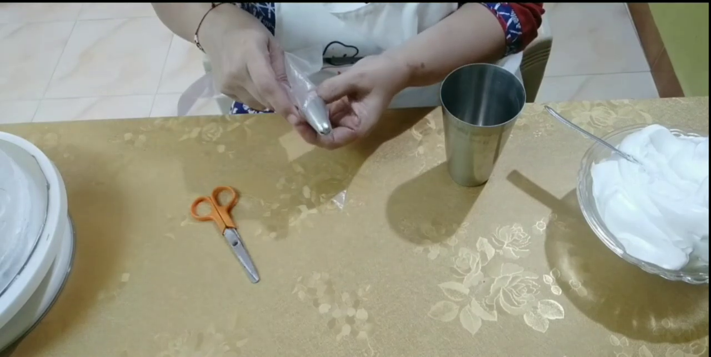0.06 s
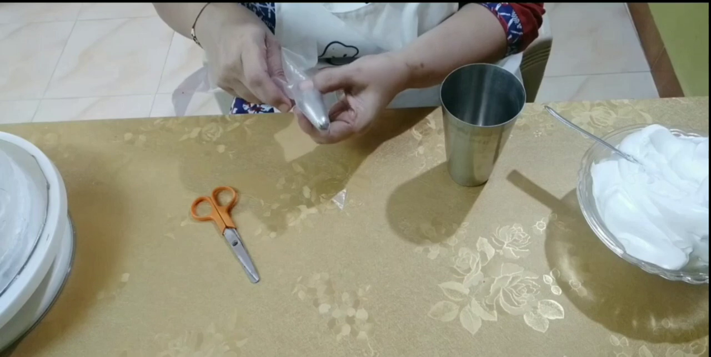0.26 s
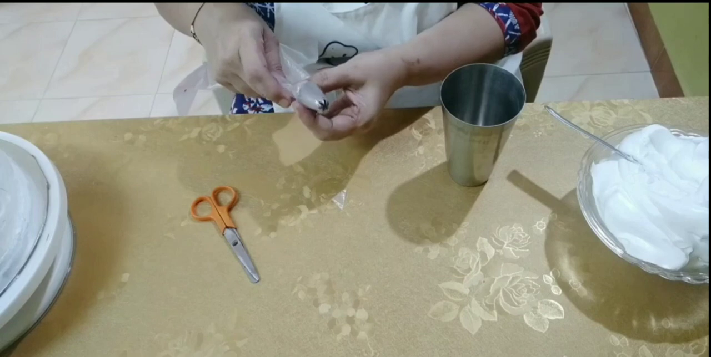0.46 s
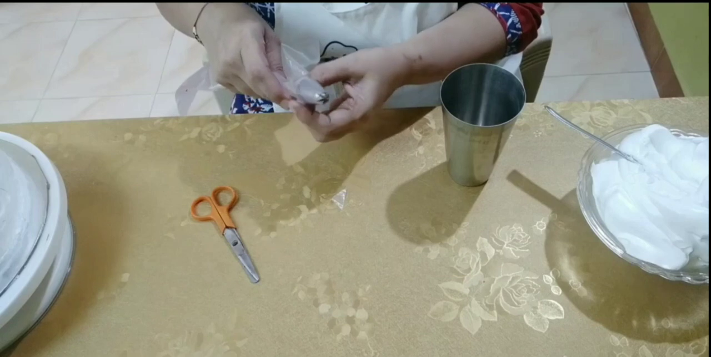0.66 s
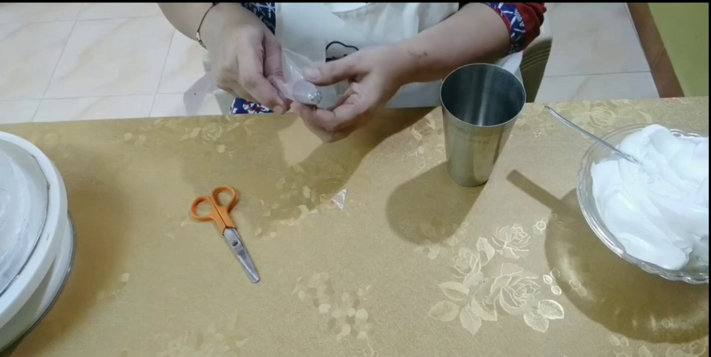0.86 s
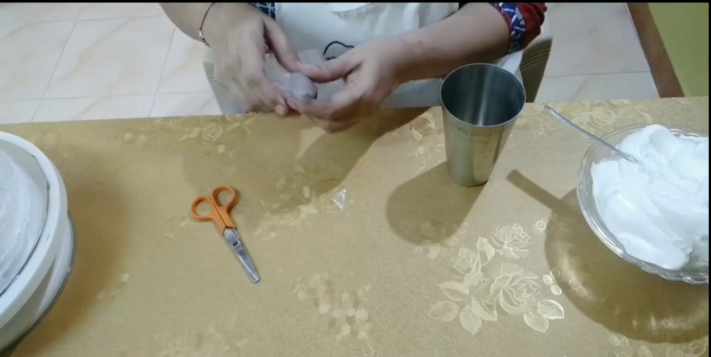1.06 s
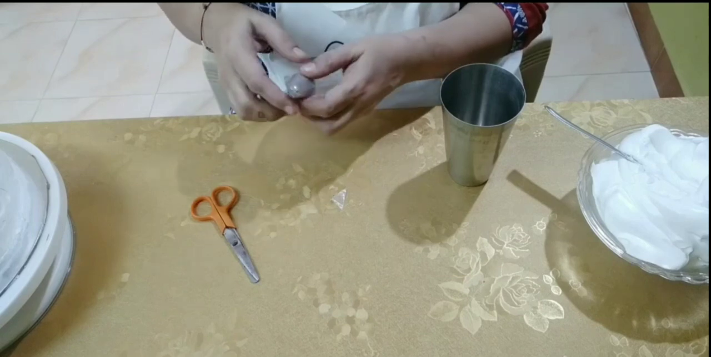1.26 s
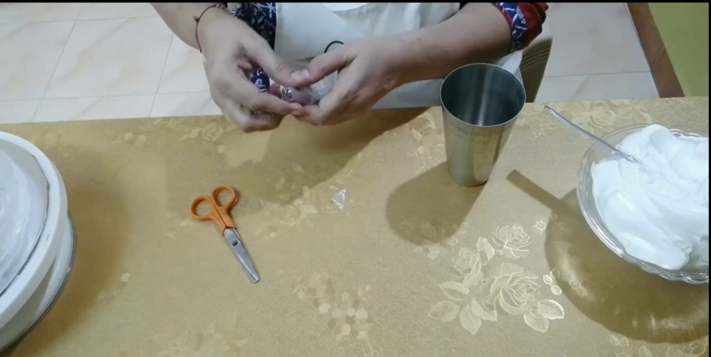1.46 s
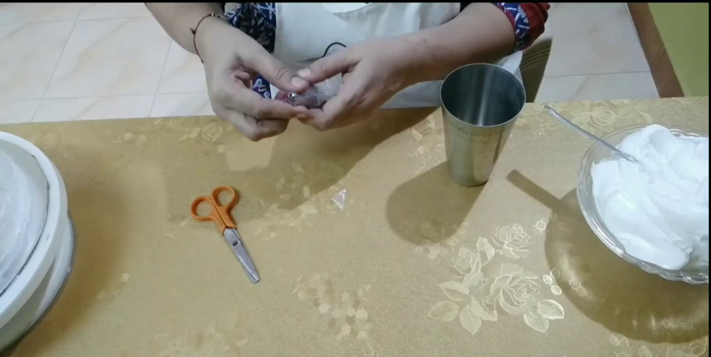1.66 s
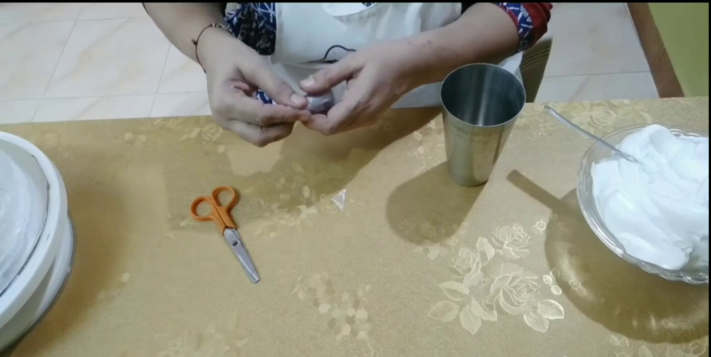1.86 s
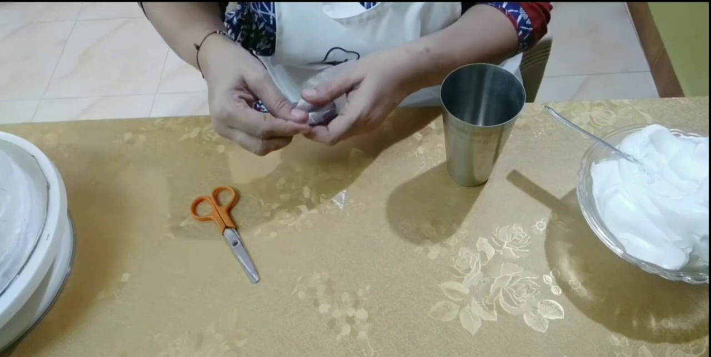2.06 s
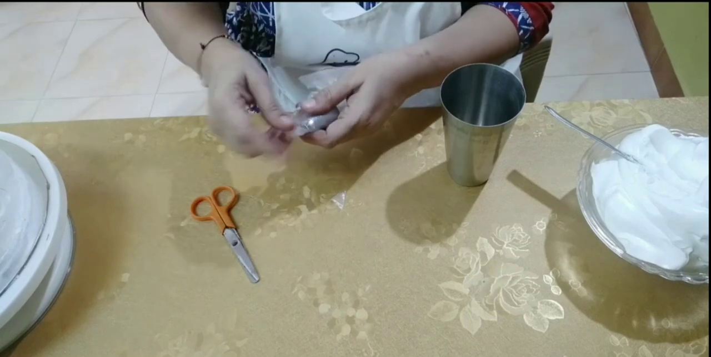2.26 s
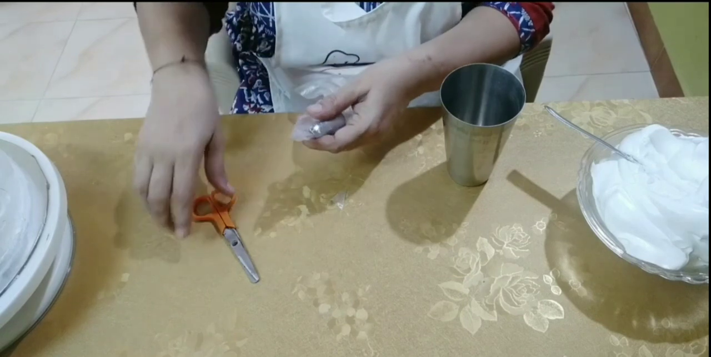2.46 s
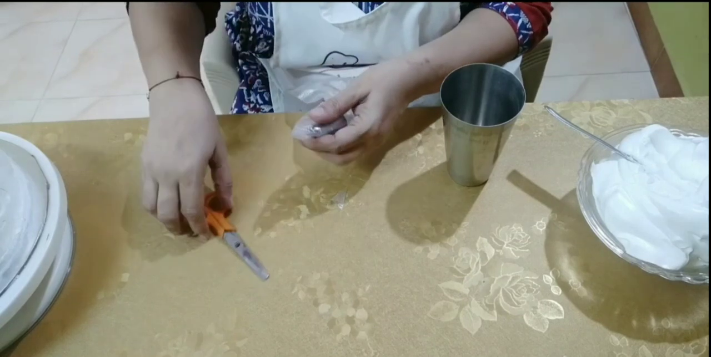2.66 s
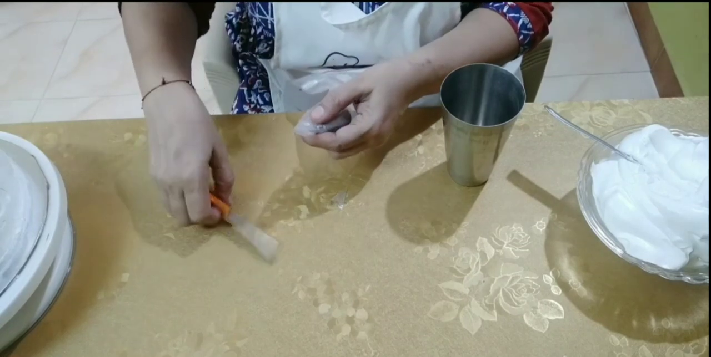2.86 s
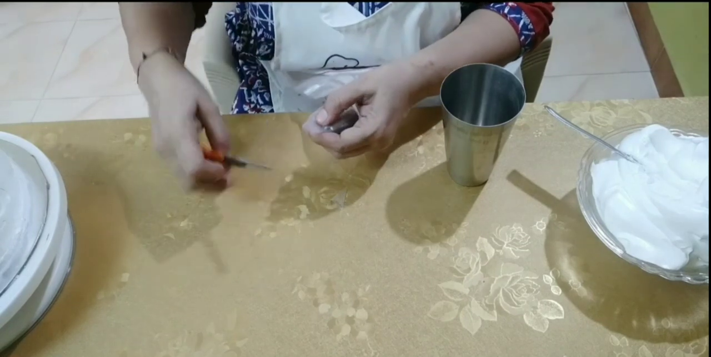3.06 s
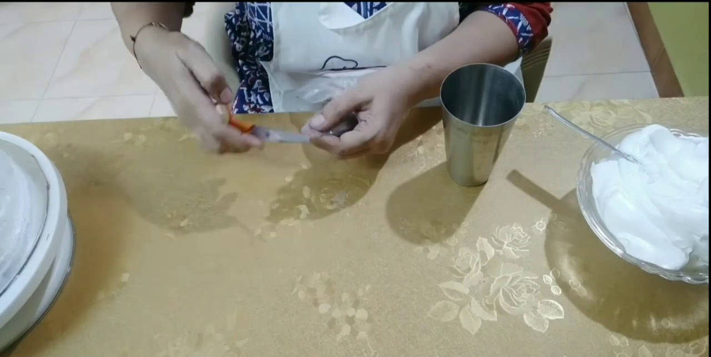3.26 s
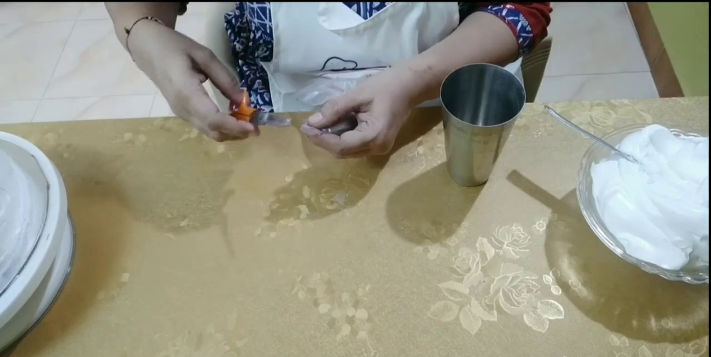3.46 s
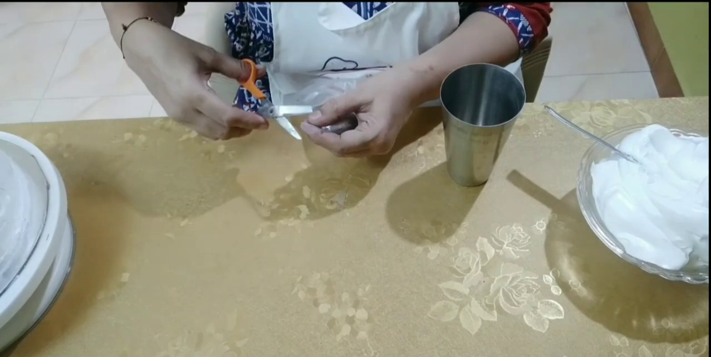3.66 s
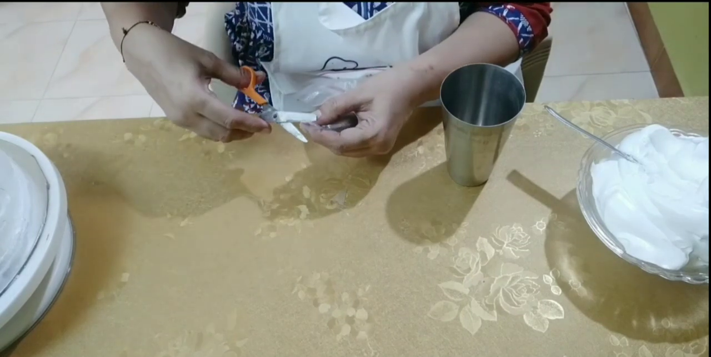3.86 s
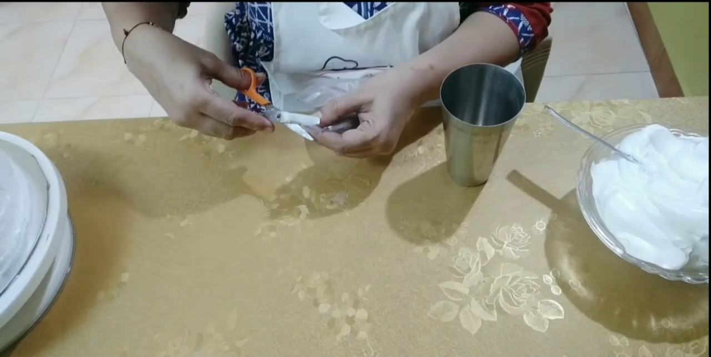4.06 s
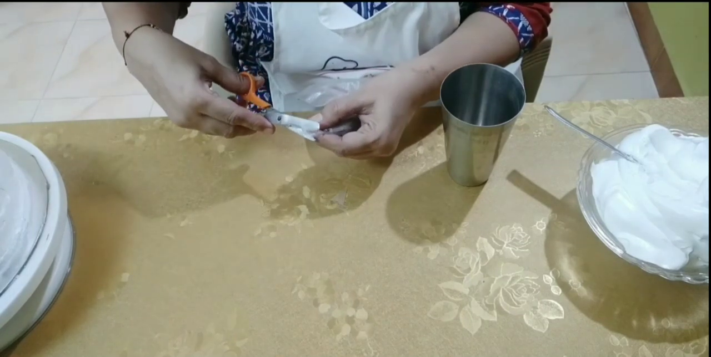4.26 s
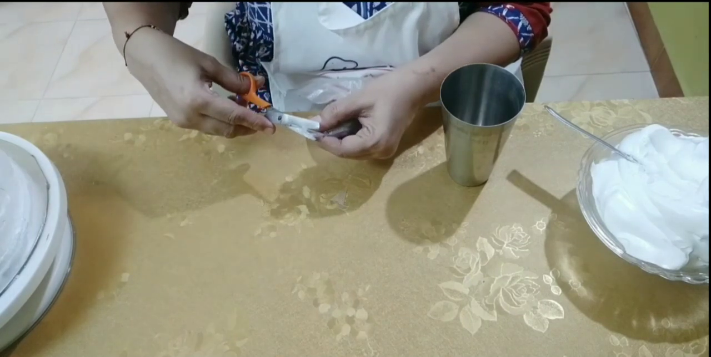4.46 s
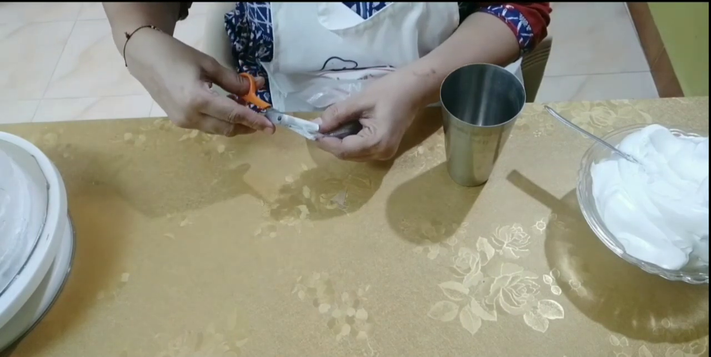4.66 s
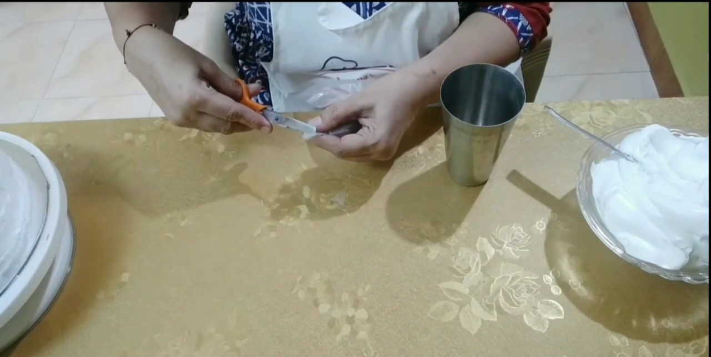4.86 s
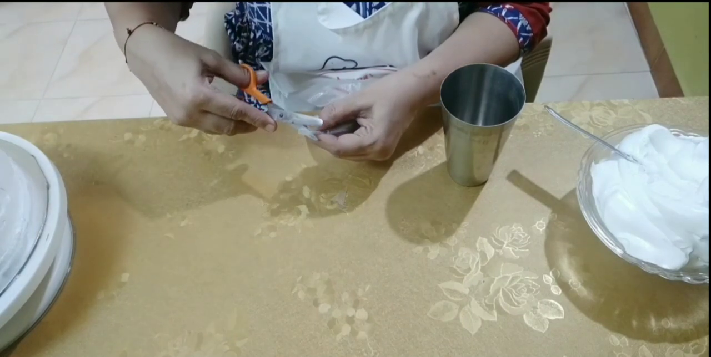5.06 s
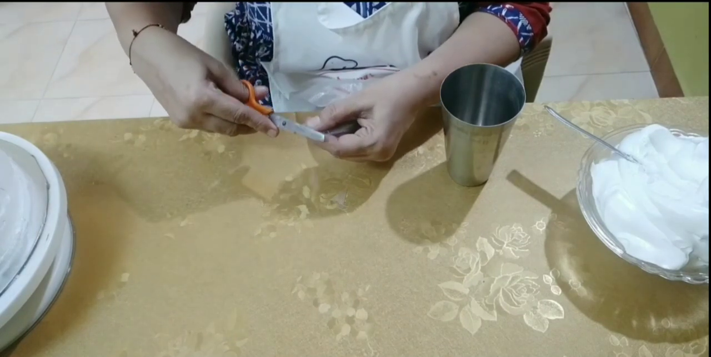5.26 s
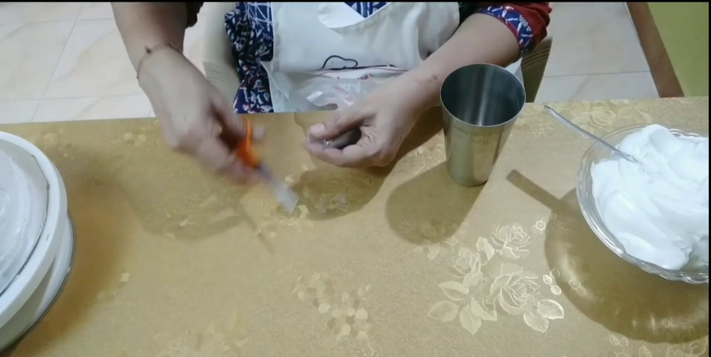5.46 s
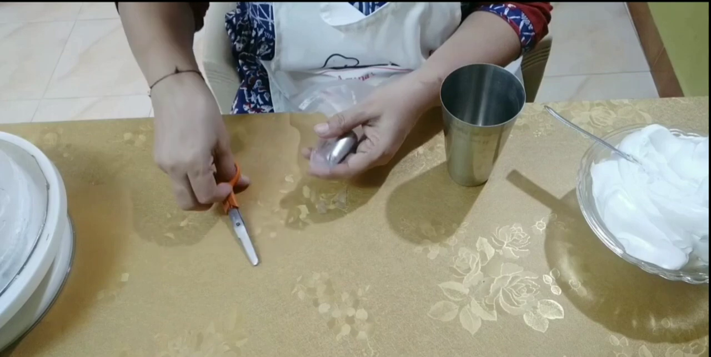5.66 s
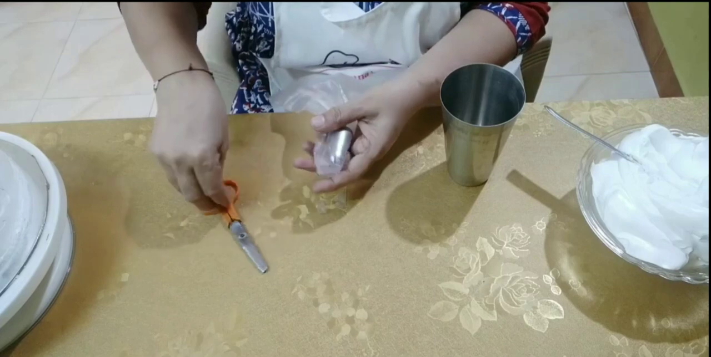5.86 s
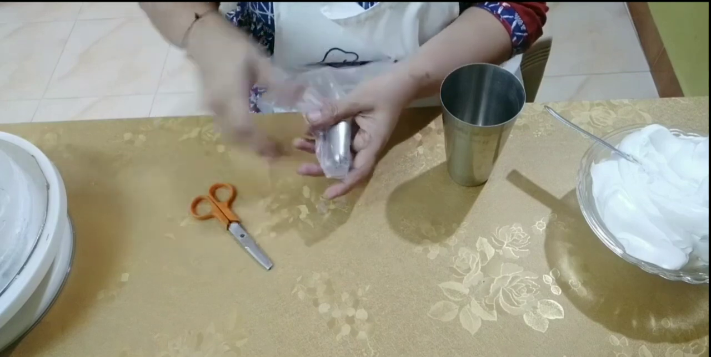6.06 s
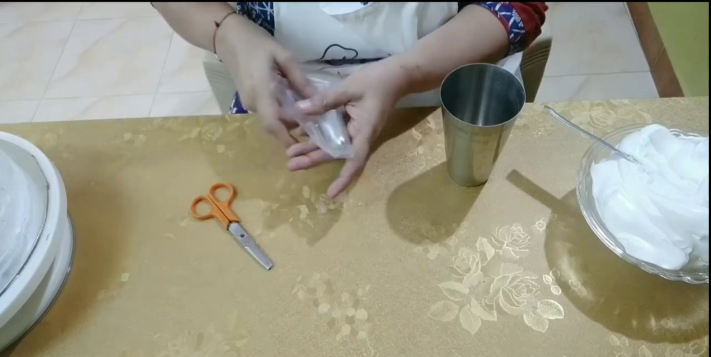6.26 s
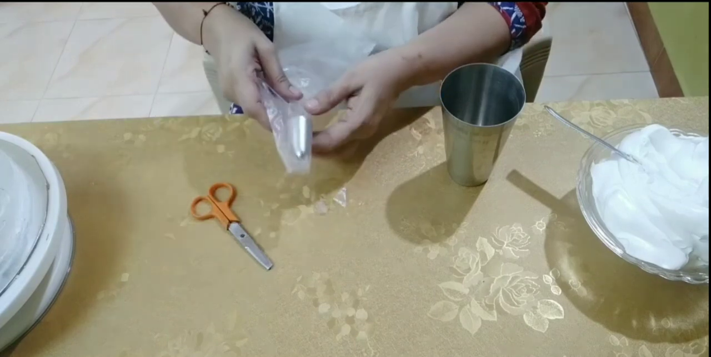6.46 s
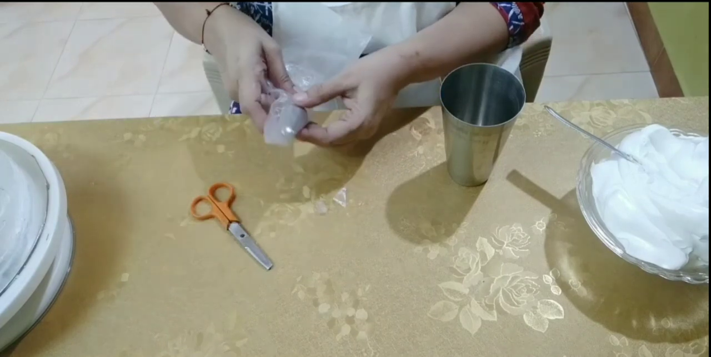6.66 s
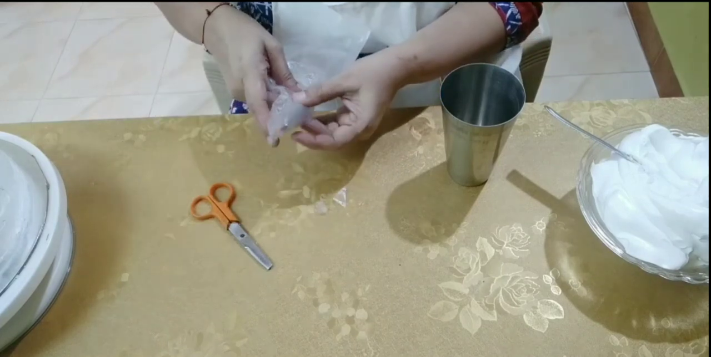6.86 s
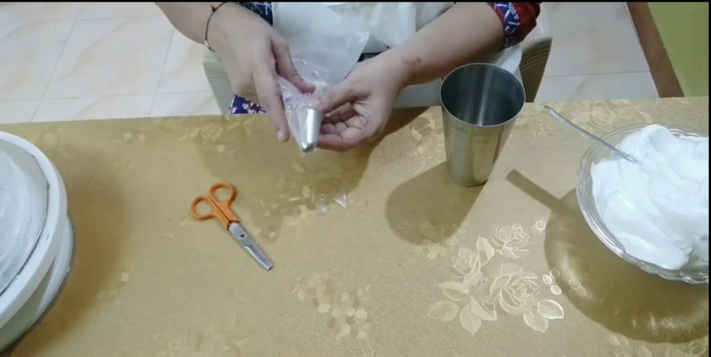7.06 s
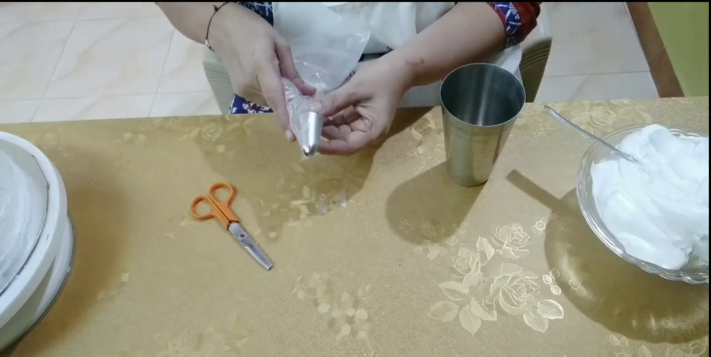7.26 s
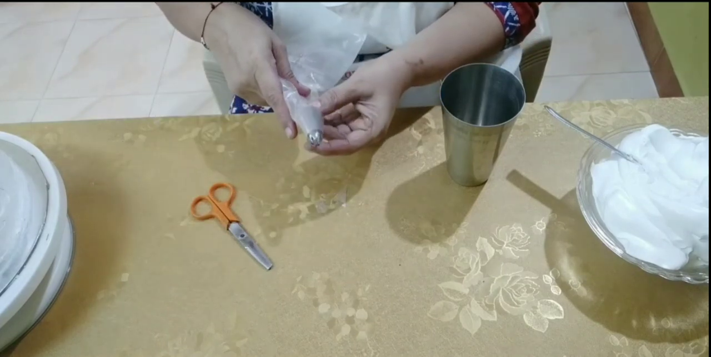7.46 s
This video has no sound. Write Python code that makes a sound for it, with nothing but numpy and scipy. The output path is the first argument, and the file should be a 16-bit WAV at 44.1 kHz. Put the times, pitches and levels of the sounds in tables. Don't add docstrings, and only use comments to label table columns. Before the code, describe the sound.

Thin plastic film crinkles and snaps close by as a metal nozzle is pushed in, scissors snip faintly, then clatter onto a table.

```python
import sys
import numpy as np
from scipy import signal
from scipy.fft import rfft, irfft
from scipy.io import wavfile
from scipy.ndimage import uniform_filter1d

SR = 44100
rng = np.random.default_rng(int(sys.argv[2]) if len(sys.argv) > 2 else 0)


def how_loud(loudness_db):
    steps = np.asarray(loudness_db, float) / 20
    return 10 ** steps


def wrap_up_sound(samples):
    columns = np.atleast_2d(samples).T
    tamed = np.clip(columns, -1, 1)
    steps = np.round(tamed * 32767).astype(np.int16)
    wavfile.write(sys.argv[1], SR, steps)


N = 331632

# (frequency [Hz], density [dB per Hz])
FILM_SUM = [(150, -42), (250, -26), (476, -11.5), (650, -9), (1240, -3.5), (1980, -3), (2500, -10.5),
            (3050, -10.5), (3250, -25.5), (3750, -23), (4120, -3.5), (6820, -3), (8400, -9.5),
            (15500, -18.5)]
FILM_DIFF = [(150, -52), (250, -16.5), (600, -21), (1010, -16), (1500, -10), (2130, -3.5), (2700, -5),
             (3700, -9), (4150, -6), (6700, -4.5), (8400, -9), (15500, -15.5)]
# (time [s], crackle [dB])
RESTLESS = [(0, -60.5), (.54, -55.5), (.65, -70.5), (.94, -70.5), (1.4, -61), (1.8, -71), (2.1, -60),
            (2.45, -60), (2.6, -73.5), (2.9, -63), (3.3, -77.5), (4.1, -88.5), (5.3, -84), (6.15, -68.5),
            (6.5, -57.5), (7.0, -43), (7.2, -57), (7.52, -61.5)]
# (time [s], crackle [dB], hold [s], body re crackle [dB])
KNEADS = [
    (.775, -51, 0.066, -2.5),
    (2.29, -52, 0.022, 1),
    (2.88, -59.5, 0.002, 2.5),
    (5.58, -71.5, 0.016, 5.5),
    (7.1, -46.5, 0.0089, 2.5),
]
# (time [s], crackle [dB], hold [s], body re crackle [dB])
SQUEEZES = [(0, -53.5, 0.038, -8), (.97, -62.5, 0.077, -1), (1.055, -36.5, 0.045, -10.5),
            (1.3, -77, 0.0033, -12), (1.38, -58, 0.0046, -53), (1.455, -41, 0.011, -14),
            (2.135, -59.5, 0.026, 4), (2.175, -50, 0.098, 0), (2.47, -58, 0.0044, -18),
            (6.22, -50, 0.016, -5), (6.27, -25.5, 0.072, -3), (6.37, -36, 0.028, -6.5),
            (6.74, -40.5, 0.004, -7), (7.12, -53, 0.0017, 7.5), (7.31, -57, 0.0036, 2),
            (7.37, -38.5, 0.0019, -2)]
# (time [s], crackle [dB], hold [s], body re crackle [dB])
SHOVE = [
    (1.84, -45, 0.015, -2.5),
    (1.875, -23.5, 0.024, -4.5),
    (1.905, -29.5, 0.045, -2.5),
]
# (time [s], crackle [dB], hold [s], body re crackle [dB], air re crackle [dB])
STROKES = [(2.62, -58.5, 0.034, 5.5, -14.5), (2.66, -59, 0.0056, 5, -13.5), (2.97, -61, 0.004, -2, -9),
           (3.055, -39, 0.0053, -6.5, -7), (3.33, -57.5, 0.02, -2.5, -9.5), (3.47, -67.5, 0.0048, 2, -15.5),
           (3.595, -48, 0.0056, -3.5, -9.5), (3.64, -55, 0.002, -28, -14), (3.94, -60, 0.0036, 0, -11.5),
           (4.08, -79.5, 0.0046, -7.5, -30), (4.15, -79, .01, -13.5, -10), (4.19, -59.5, 0.0039, -10, -3.5),
           (4.33, -61.5, 0.033, -5, -5), (4.39, -54.5, 0.053, -6, -9), (4.45, -47, 0.0032, -7.5, -11),
           (4.73, -77, 0.033, -1, -7.5), (4.842, -56.5, 0.025, -13, -4), (4.8, -71.5, 0.015, -2, -8),
           (4.88, -50, 0.0017, -7, -9.5), (5.03, -62.5, 0.0067, -2.5, -6.5), (5.305, -56, 0.028, 8, -4.5),
           (5.72, -73, 0.11, 12, -9), (5.9, -37.5, 0.016, -8.5, -11.5), (5.945, -32, 0.018, 6, -9),
           (5.99, -40.5, 0.016, 12.5, -10.5)]
# (time [s], peak [dB], body re peak [dB])
NOZZLE_CREASES = [(.0947, -38, -2), (.1095, -43, -2), (.1885, -55, 6), (.2319, -37, -9), (.266, -34, -4),
                  (.2997, -36.5, 4), (.312, -36.5, -14), (.3496, -40, -3), (.4105, -33.5, -7),
                  (.452, -31, -21), (.468, -44, -20), (.5182, -42, -19), (.5796, -36.5, -17),
                  (.7043, -41, -16.5), (.7437, -38, 3.5), (.819, -41, -18), (1.058, -24, -24),
                  (1.071, -48, -15), (1.095, -48, -5), (1.195, -35, -8), (1.8663, -31, -9),
                  (1.885, -15, -23), (1.913, -20.5, -18), (1.9341, -20, -16), (2.2033, -39, 5),
                  (2.21, -48, -14), (2.3844, -62, -6), (2.4038, -42, 4.5), (2.4497, -38, -4),
                  (.1173, -44, 7), (.1433, -30.5, -0.5), (.2463, -28, -7.5), (.402, -33, -10),
                  (.44, -32, -2.5), (.5402, -33, -21), (.6536, -39.5, -0.5), (.964, -37.5, -14),
                  (1.043, -26.5, -3), (1.2787, -36.5, -26), (1.295, -49, -21), (1.3685, -27.5, -8.5),
                  (1.4364, -32.5, -2), (1.4483, -20, -33), (1.4625, -26.5, -1.5), (1.472, -23, -7),
                  (1.5365, -28.5, -9.5), (1.6728, -38.5, -9), (1.8103, -56, -19), (1.8262, -38, -13),
                  (1.84, -26.5, 1.5), (1.8527, -21, -30), (1.8752, -13, 3), (1.997, -26.5, -16.5),
                  (2.134, -25, -18), (2.158, -24, -26), (2.163, -24, -29), (2.168, -16.5, -22)]
# (time [s], peak [dB], body re peak [dB])
HANDLE_TICKS = [(2.6175, -32, 1.5), (2.7887, -37.5, -10), (2.85, -37, -20), (2.8858, -40, -26),
                (2.9708, -35.5, -25), (3.025, -37, 4), (3.044, -23, -8), (3.0475, -18.5, -20),
                (3.057, -37, -17), (3.071, -33, -30), (3.078, -50, -19), (3.214, -40.5, -18),
                (3.3189, -53, -13), (3.452, -50.5, 0.5), (3.478, -36, -38), (5.454, -45, 0.5),
                (5.553, -47, -18), (5.813, -51, -26), (5.7003, -33, 5.5), (5.7204, -32, 2.5),
                (5.8805, -29, -9), (5.901, -16.5, -22), (5.913, -24, -5), (5.925, -32, -3),
                (5.999, -18.5, -12), (5.938, -15, 11.5)]
# (time [s], peak [dB], body re peak [dB])
BLADE_TICKS = [(3.5663, -41.5, -4), (3.5844, -34.5, 2), (3.6024, -34, -9), (3.6338, -28, -40),
               (3.9105, -51, 3), (3.926, -33, -12.5), (4.0676, -45.5, -6), (4.126, -42, -8.5),
               (4.148, -37.5, -32.5), (4.1699, -35, -26), (4.1853, -34.5, -40), (4.3238, -32, -23),
               (4.369, -28, -17.5), (4.411, -28, -35), (4.45, -26, -12.5), (4.6795, -50, -11.5),
               (4.7224, -38, -22), (4.8219, -51, -31), (4.8399, -35.5, -30), (4.857, -30, -32),
               (4.868, -36, -10), (4.8758, -21, -10.5), (5.024, -38, -24), (5.274, -53.5, -21.5),
               (5.281, -56, -21), (5.298, -31.5, 4)]
# (time [s], peak [dB], body re peak [dB])
OPENING_CREASES = [(6.221, -23, -12), (6.2343, -16, -9), (6.2667, -16, -5), (6.2846, -8, -3),
                   (6.291, -12, -1), (6.31, -10, -24), (6.3225, -14.5, -15), (6.328, -23, -13),
                   (6.386, -18.5, -17), (6.4528, -38, 1), (6.5441, -51, -11), (6.5721, -38.5, 4.5),
                   (6.6045, -57, -1), (6.6359, -52, -21), (7.0609, -34, -17), (7.25, -29.5, -8),
                   (7.4785, -44, -27), (6.2061, -19.5, -23), (6.2492, -12.5, -19), (6.6586, -31.5, -23),
                   (6.6885, -26.5, -3), (6.7405, -22.5, -3.5), (6.877, -25, -6), (6.1925, -52, -15),
                   (7.086, -22, -10), (7.091, -21.5, -9), (6.947, -28, -4), (7.0, -30.5, 3),
                   (7.1112, -21.5, -21), (7.2243, -35, 4.5), (7.2963, -32.5, -10), (7.339, -29.5, -7),
                   (7.3517, -27, -10), (7.3706, -21, -20)]
# (time [s], peak [dB], rattle length [s], first blow [0-2], rattle build-up [s])
KNOCKS = [
    (2.623, -23.5, 0.046, 0.02, 0.017),
    (5.700, -33, 0.035, 0.32, 0.0047),
    (5.9354, -15.5, 0.056, 1, 0.0022),
]
# (time [s], blow [0-2])
BOUNCES = [
    (2.632, 0.49),
    (2.644, 0.41),
    (2.653, 0.46),
    (2.667, 0.2),
    (5.938, 1),
    (5.945, 0.13),
    (5.959, 0.99),
    (5.97, 0.48),
    (5.977, 0.45),
    (5.999, 0.21),
]
# (frequency [Hz], level [dB], t60 [s])
LIFT_MODES = [(267, -8.5, 0.34), (526, -15, 0.33), (670, -16, 0.082), (778, -1.5, 0.2), (860, -11, 0.093),
              (930, 3, 0.24), (1010, -18, 0.19), (1565, -18, .15), (1710, -22, .06)]
TOUCH_MODES = [(308, 2.5, 0.81), (568, 7.5, 0.31), (721, 13.5, 0.18), (1085, 6, 0.12), (1200, -2, 0.15),
               (1287, -38, 0.17), (1630, 10, 0.14), (1930, -7, 0.13)]
DROP_MODES = [(295, -0.5, 0.6), (531.5, 0, 1), (574, 2, 0.69), (644, 4, 0.36), (724, 3.5, 0.19),
              (782, -4.5, 0.64), (918, 2, 0.48), (1220, -2.5, 0.27), (1423, 2, 0.1), (1866, 5.5, 0.3),
              (2100, 0.5, 0.096), (2180, -10, 0.16), (2240, -23, .1), (2650, -45, 0.026)]
# (time [s], peak [dB], pitch [Hz])
BITES = [(1.466, -34.5, 1880), (3.5867, -41.5, 1780), (3.602, -34, 1800), (3.8129, -42, 1307),
         (3.925, -38, 1150), (4.065, -49, 1206), (4.3226, -40, 1370), (4.331, -36, 1326),
         (4.4274, -37, 1290), (4.4498, -35, 1910), (4.7213, -48.5, 1270), (4.859, -40, 1870),
         (4.8735, -30.5, 1210), (5.0245, -44.5, 1870), (5.297, -29.5, 1785), (5.298, -34.5, 4510),
         (1.872, -31, 560), (1.9, -28.5, 537), (1.877, -25, 1810)]
# (time [s], level [dB])
RUMBLE = [(0, -56), (.45, -54), (.9, -57), (1.5, -55), (2.3, -58.5), (2.9, -53.5), (3.5, -59), (3.8, -56.5),
          (4.2, -58), (5.2, -64), (6.1, -59.5), (6.6, -63.5), (7.52, -63)]
# (frequency [Hz], density [dB per Hz])
VEHICLE_COLOUR = [(15, -70.5), (25, -47), (54, -28.5), (149, 1.5), (217, -14.5), (297, -17), (330, -22.5),
                  (541, -18.5), (900, -25), (1170, -49), (1980, -120)]
HUM_COLOUR = [(15, -30), (40, -26), (64, -50), (91, 0.5), (156, -6), (184, 6.5), (223, -13), (297, -7.5),
              (330, -21), (372, -2.5), (425, -18.5), (533, -11), (900, -20.5), (1170, -27), (1980, -120)]
# (frequency [Hz], lean [dB])
LEAN = [(250, 1.5), (550, -5), (1100, 0.5), (1800, -2), (3800, 1), (4100, -4.5), (7500, -6), (9500, 7.5),
        (15000, -2.5)]
# (time [s], share [0-2])
DRIFT = [
    (0, 0.45),
    (1, 0.65),
    (3.8, 1.24),
    (5.6, 0.68),
    (6.3, 0.41),
    (7.52, 0.75),
]
# (time [s], level [dB])
TOLERANCE = [(0, 6), (.08, -5.5), (.2, -3.5), (.3, -4.5), (.47, -1), (.53, -1), (.65, 0.5), (.75, -3.5),
             (.85, 0), (.92, -7), (1.2, -6.5), (1.42, 5), (1.46, -8.5), (1.5, 0), (1.78, -2.5),
             (1.85, -12.5), (1.885, -1.5), (1.93, -3), (1.96, -19), (2.04, 7), (2.11, 7), (2.15, -16),
             (2.19, -11), (2.24, -2), (2.45, -3.5), (2.62, -11), (2.8, -2), (3.0, -7.5), (3.05, -3),
             (3.1, -10), (3.17, 6), (3.22, -7), (3.3, -1), (3.4, -10.5), (4.0, -4), (4.4, -3.5),
             (4.45, -21.5), (4.52, 2), (4.65, -2.5), (4.8, -11), (4.83, -10), (4.85, 10), (4.9, 7.5),
             (4.95, 5), (5.0, 1.5), (5.03, -13.5), (5.06, 0.5), (5.15, 7.5), (5.2, -6.5), (5.29, -15.5),
             (5.31, 1.5), (5.33, -19), (5.4, -25), (5.43, 6.5), (5.5, -8), (5.7, -22.5), (5.8, 4),
             (5.86, 5), (5.89, -30), (5.945, -24), (5.965, 3), (6.0, 1), (6.03, -18), (6.06, -5.5),
             (6.33, 0), (6.36, -8), (6.4, -1), (7.2, -1), (7.4, -9), (7.52, -5)]

BODY_TOP_HZ, AIR_FOOT_HZ, TOP_HZ = 3800, 8200, 15800
DIFF_DB, KNOCK_DIFF_DB, RUMBLE_DIFF_DB = 0.5, -11, -14
BLADES_S, BLADE_FOOT_HZ = (3.72, 5.6), 900
REST_BODY_DB, REST_BODY_TILT, REST_AIR_DB = -1.5, -0.026, -10
# (rise [dB per s], fall [dB per s])
KNEAD_PACE, SQUEEZE_PACE, SHOVE_PACE, STROKE_PACE = (130, 300), (630, 298), (600, 2200), (1030, 362)
KNEAD_AIR_DB, SQUEEZE_AIR_DB = -10, -10
HARD_DB, HARD_AIR_TILT = -37, 0.17
SETTLE_DB, SETTLE_DB_PER_S, SETTLE_BODY_DB = -20.5, 130, 2.5
CREASE_T60_S, HANDLE_T60_S, BLADE_T60_S, OPENING_T60_S = 0.18, 0.15, 0.12, 0.2
PING_DB, PING_T60_S, PING_LOW_HZ, PING_SPAN = -10, .009, 4300, 1.8
THUD, THUD_T60_S = .9, .025
KNOCK_TAIL_DB, ROOM_DRIVE_DB = -9, -4.5
PASSED_S, PASSING_S = 3.28, 0.85
GATE_SHARE, GATE_MID_DB, GATE_TOP_DB, GATE_S = 0.41, -50.5, -22, 0.016
THUMP_DB, THUMP_SHARE, THUMP_LAG_S, THUMP_S = -35.5, 0.64, 0.044, 0.036
SPARED_HZ, SPARED_DB_PER_OCTAVE = (2550, 3050), 45


def in_time(rows):
    s, *columns = np.transpose(rows)
    return [np.interp(np.arange(N) / SR, s, c) for c in columns]


def rms_one(x):
    return x / np.sqrt(np.mean(x ** 2) + 1e-20)


def colour(x, points, slope=1, low_hz=1, high_hz=SR):
    size = 4096
    hz = np.arange(size // 2 + 1) * SR / size + 1e-3
    point_hz, point_db = np.transpose(points)
    level_db = slope * np.interp(np.log(hz), np.log(point_hz), point_db)
    level_db = level_db - 10 * np.log10((1 + (low_hz / hz) ** 40) * (1 + (hz / high_hz) ** 40))
    cepstrum = irfft(np.log(how_loud(np.maximum(level_db, -90))))
    cepstrum[1:size // 2] *= 2
    cepstrum[size // 2 + 1:] = 0
    return signal.oaconvolve(x, irfft(np.exp(rfft(cepstrum))))[:N]


def fade(clicks, t60):
    return signal.lfilter([1], [1, -how_loud(-60 / (t60 * SR))], clicks + 1e-18)


def ring(drive, hz, t60):
    r, w = how_loud(-60 / (t60 * SR)), 2 * np.pi * hz / SR
    return signal.lfilter([0, np.sin(w)], [1, -2 * r * np.cos(w), r * r], drive + 1e-18)


def burst(s, t60, hold):
    t = np.arange(N) / SR - s
    return (t >= 0) * how_loud(-60 * np.clip(t, 0, 2) / t60 - 400 * np.clip(t - hold, 0, 1))


def film():
    crackle_db, body_db, air_db = handling()
    creases = swarm(per_s=300, spread_db=2.6, t60=0.025, wash=0.4)
    grains = creases * how_loud(crackle_db - 3.0)
    fine = (creases + np.roll(creases, N // 3)) / 2 * how_loud(crackle_db - 2.5)
    folds = swarm(per_s=150, spread_db=1.5, t60=0.13, wash=0.26)
    folds = folds * how_loud(crackle_db + body_db - 5.5)

    bright, dull = np.zeros(N), np.zeros(N)
    t = np.arange(int(.12 * SR)) / SR
    for s, peak_db, body_re_peak_db, t60 in snaps():
        i = round(s * SR)
        shape = 0.6 * how_loud(-60 * t / 0.009) + 0.24 * how_loud(-60 * t / t60)
        bright[i:i + len(t)] += (how_loud(peak_db - 12.5) * shape)[:N - i]
        dull[i:i + len(t)] += (how_loud(peak_db + body_re_peak_db - 11.5) * shape)[:N - i]

    body = np.hypot(folds, dull)
    crackle = np.hypot(grains, bright)
    air = np.hypot(fine, 0.97 * bright) * how_loud(air_db)
    edges = (1, BODY_TOP_HZ), (BODY_TOP_HZ, AIR_FOOT_HZ), (AIR_FOOT_HZ, SR)
    unit, out = np.eye(1, N)[0], np.zeros((2, N))
    for drive, (low, high) in zip((body, crackle, air), edges):
        scale = np.linalg.norm(colour(unit, FILM_SUM, 0.95, low, high))
        out[0] += colour(drive * rng.standard_normal(N), FILM_SUM, 0.72, low, high) / scale
        difference = colour(drive * rng.standard_normal(N), FILM_DIFF, 0.92, low, high)
        out[1] += difference / scale * how_loud(DIFF_DB)

    tip_s = np.repeat(BLADES_S, 2) + [-.05, 0, 0, .05]
    tip = np.interp(np.arange(N) / SR, tip_s, [0, 1, 1, 0])
    no_lows = signal.butter(2, BLADE_FOOT_HZ, "high", fs=SR, output="sos")
    return out + tip * (signal.sosfilt(no_lows, out) - out)


def swarm(per_s, spread_db, t60, wash):
    sizes = how_loud(2 * spread_db * np.minimum(rng.exponential(1, N), 4.5))
    sizes = sizes * (rng.random(N) < per_s / SR)
    power = fade(sizes, t60 / 2)
    return rms_one(np.sqrt(power / power.mean() + wash))


def cracks():
    small = (rng.random(N) < 120 / SR) * np.minimum(rng.exponential(1, N), 2.5)
    clicks = small * how_loud(handling()[0] + 12) * rng.choice([-1, 1], N)
    events = snaps()
    clicks[np.round(events[:, 0] * SR).astype(int)] += how_loud(events[:, 1] + 2)

    pings, t = np.zeros((2, N + 600)), np.arange(600) / SR
    for s, peak_db, *_ in events:
        pitch, lean = rng.random(2)
        hz = PING_LOW_HZ * PING_SPAN ** pitch
        ping = how_loud(peak_db + PING_DB - 60 * t / PING_T60_S) * np.sin(2 * np.pi * hz * t)
        i = round(s * SR)
        pings[:, i:i + len(t)] += ping * [[1], [2 * lean - 1]]
    total = colour(clicks, FILM_SUM, 0.7, 980)
    difference = 0.4 * colour(clicks, FILM_DIFF, 0.31, 900)
    return pings[:, :N] + np.array([total, difference])


def snaps():
    kinds = ((NOZZLE_CREASES, CREASE_T60_S), (HANDLE_TICKS, HANDLE_T60_S),
             (BLADE_TICKS, BLADE_T60_S), (OPENING_CREASES, OPENING_T60_S))
    return np.array([(*row, t60) for rows, t60 in kinds for row in rows])


def handling():
    rest_db, = in_time(RESTLESS)
    body_db = REST_BODY_DB + REST_BODY_TILT * (rest_db - GATE_MID_DB)
    power = how_loud(2 * np.array([rest_db, rest_db + body_db, rest_db + REST_AIR_DB]))
    power = power + moves(KNEADS, KNEAD_PACE, KNEAD_AIR_DB)
    power = power + moves(SQUEEZES, SQUEEZE_PACE, SQUEEZE_AIR_DB)
    power = power + moves(SHOVE, SHOVE_PACE, SQUEEZE_AIR_DB)
    power = power + moves(STROKES, STROKE_PACE)
    crackle, body, air = 10 * np.log10(power)
    return crackle, body - crackle, air - crackle


def moves(rows, pace, air_db=0):
    t, out = np.arange(0, N, 64) / SR, 0
    rise, fall = pace
    for s, level_db, hold, body_db, *own_air in rows:
        early, late = np.maximum(s - t, 0), np.maximum(t - s - hold, 0)
        move = how_loud(2 * (level_db - rise * early - fall * late))
        settle = how_loud(2 * (level_db + SETTLE_DB - rise * early - SETTLE_DB_PER_S * late))
        body = how_loud(2 * body_db) * move + how_loud(2 * SETTLE_BODY_DB) * settle
        air = how_loud(2 * (air_db + sum(own_air) + HARD_AIR_TILT * max(level_db - HARD_DB, 0)))
        out = out + np.array([move + settle, body, air * (move + settle)])
    return np.array([np.interp(np.arange(N) / SR, t, power) for power in out])


def knocks():
    out = np.zeros((2, N))
    for (s, peak_db, hold, blow, build), modes in zip(KNOCKS, (LIFT_MODES, TOUCH_MODES, DROP_MODES)):
        swell = np.clip((np.arange(N) / SR - s) / build, .3, 1)
        swell = swell * (burst(s, 0.94, hold) + how_loud(ROOM_DRIVE_DB) * burst(s, 1.0, .3))
        gated = burst(s, 5.3, hold) + how_loud(KNOCK_TAIL_DB) * burst(s, 0.65, 0.27)
        for port, port_db in enumerate((0, KNOCK_DIFF_DB)):
            for hz, mode_db, t60 in modes:
                drive = .035 * rng.standard_normal(N) * swell
                drive[round(s * SR)] += blow
                for later_s, again in BOUNCES:
                    drive[round(later_s * SR)] += again * rng.normal(1, .5)
                thud = THUD * min(hz / 650, 1) ** 2 * ring(drive, 1.07 * hz, THUD_T60_S)
                body = ring(drive, hz, 0.5 * t60) + thud
                out[port] += how_loud(peak_db + mode_db + port_db - 20.5) * body * gated
    return signal.sosfilt(signal.butter(4, 210, "high", fs=SR, output="sos"), out)


def bites():
    out, t = np.zeros((2, N)), np.arange(int(.08 * SR)) / SR
    for s, peak_db, hz in BITES:
        decay = how_loud(-60 * t / 0.019) + 0.65 * how_loud(-60 * t / 0.069)
        puff = rng.standard_normal((2, len(t))) * decay
        i = round(s * SR)
        out[:, i:i + len(t)] += how_loud(peak_db - 28.5) * ring(puff, hz, 0.016) * how_loud([[0], [-5.5]])
    return out


def rumble():
    gone = np.clip((np.arange(N) / SR - PASSED_S) / PASSING_S + .5, 0, 1)
    drone = np.array([rms_one(colour(n, VEHICLE_COLOUR)) for n in rng.standard_normal((2, N))])
    hum = np.array([rms_one(colour(n, HUM_COLOUR)) for n in rng.standard_normal((2, N))])
    return (np.sqrt(1 - gone) * drone + np.sqrt(gone) * hum) * gate() * how_loud([[.3], [RUMBLE_DIFF_DB]])


def gate():
    t = np.arange(N) / SR
    near_db = uniform_filter1d(np.minimum(handling()[0], GATE_TOP_DB), int(GATE_S * SR))
    power = how_loud(2 * (in_time(RUMBLE)[0] + GATE_SHARE * (near_db - GATE_MID_DB)))
    for s, peak_db, *_ in KNOCKS:
        boom = np.exp(-((t - s - THUMP_LAG_S) / THUMP_S) ** 2)
        power = power + how_loud(2 * (THUMP_DB + THUMP_SHARE * peak_db)) * boom
    return np.sqrt(power)


def scene():
    total, difference = film() + cracks() + knocks() + bites() + rumble()
    level = np.array([total + difference, total - difference])
    hz = np.arange(N // 2 + 1) * SR / N + 1
    lean_hz, lean_db = np.transpose(LEAN)
    lean = how_loud(np.interp(np.log(hz), np.log(lean_hz), lean_db / 2))
    leaning = irfft(rfft(level) * [lean, 1 / lean], N)
    return level + in_time(DRIFT)[0] * (leaning - level)


def thin_out(x, side_db, masked_db, whim_db):
    start, size = 808, 2048
    window = np.sin(np.pi * (np.arange(size) + .5) / size)
    ports = np.array([x[0] + x[1], x[0] - x[1]])[:, start:] / 2
    hz, s, bins = signal.stft(ports, SR, window, size)
    edges = np.cumsum(np.r_[0, [4] * 10, [8] * 15, [16] * 14, [8] * 46])
    power = np.abs(bins) ** 2
    crackle = power[:, (hz > BODY_TOP_HZ) & (hz < AIR_FOOT_HZ)].mean((0, 1))
    loud_db = 10 * np.log10(crackle + 1e-14)
    below_top_db = loud_db.max() - loud_db

    rival_db = np.array([np.interp(s + start / SR, *np.transpose(TOLERANCE)), side_db + 0 * s])
    rival_db[0] += 0.23 * (loud_db - uniform_filter1d(loud_db, size=21))
    rival_db[0] -= 5 * (np.diff(loud_db, prepend=loud_db[0]) > 9)
    rival_db[0] -= 0.78 * np.maximum(below_top_db - 45.5, 0)
    rival_db[0] += 2.5 + whim_db / 2 * rng.standard_normal(len(s))

    spared_hz = np.where(s < PASSED_S, *SPARED_HZ)
    for low, high in zip(edges, edges[1:]):
        level = power[:, low:high].mean(1) * how_loud(2 * whim_db * rng.standard_normal((2, len(s))))
        if hz[low] > AIR_FOOT_HZ:
            mask = crackle * how_loud(2 * masked_db - 11 * np.log2(hz[low] / AIR_FOOT_HZ))
            bins[:, low:high] *= (level > mask)[:, None]
        elif hz[high] < BODY_TOP_HZ:
            weak = int(hz[low] < 1800)
            octaves = np.maximum(np.log2(spared_hz / hz[low]), 0)
            margin_db = 2 * rival_db[weak] - SPARED_DB_PER_OCTAVE * (1 - weak) * octaves
            own = np.sqrt(level[weak] * power[weak, low:high].mean(0))
            bins[weak, low:high] *= own > power[1 - weak, low:high].mean(0) * how_loud(margin_db)

    flutter = np.abs(uniform_filter1d(rng.standard_normal(len(s)), size=3))
    ceiling_hz = TOP_HZ - 900 * flutter - 60 * np.maximum(below_top_db - 30, 0)
    bins[:, hz[:, None] > ceiling_hz] = 0
    total, difference = signal.istft(bins, SR, window, size)[1][:, :N - start]
    return np.c_[x[:, :start], [total + difference, total - difference]]


def low_pass(x):
    return signal.sosfilt(signal.butter(12, 16500, fs=SR, output="sos"), x)


def record(dry):
    thinned = thin_out(dry, side_db=-14, masked_db=-10, whim_db=3.2)
    return low_pass(thinned)


dry = scene()
out = record(dry)
wrap_up_sound(out)
```